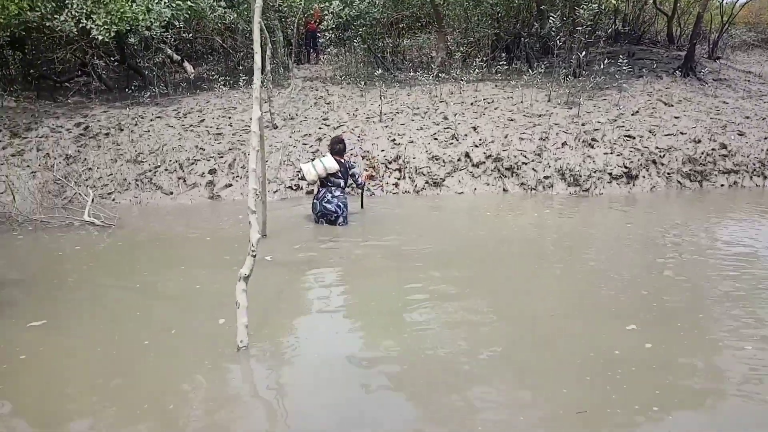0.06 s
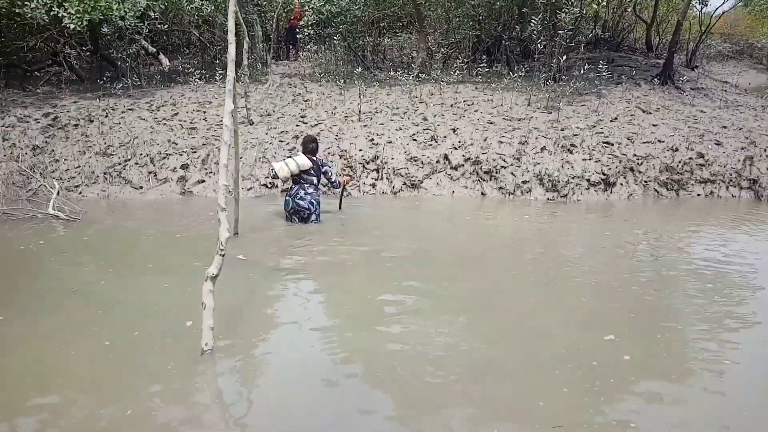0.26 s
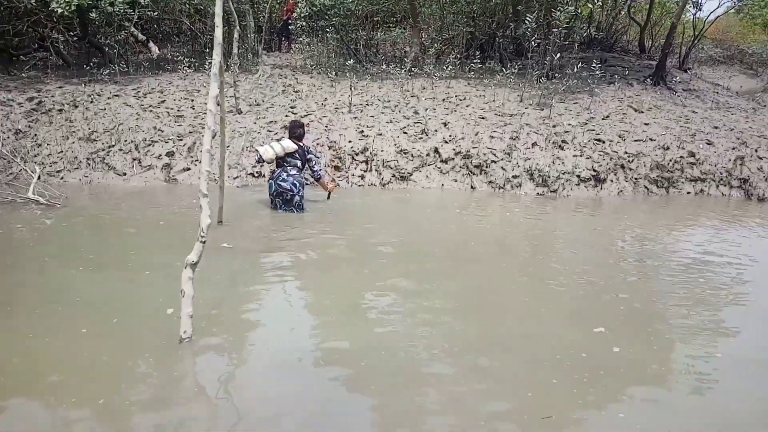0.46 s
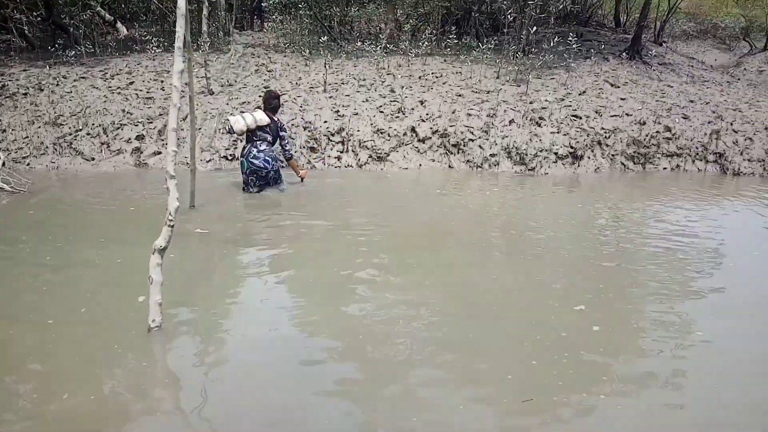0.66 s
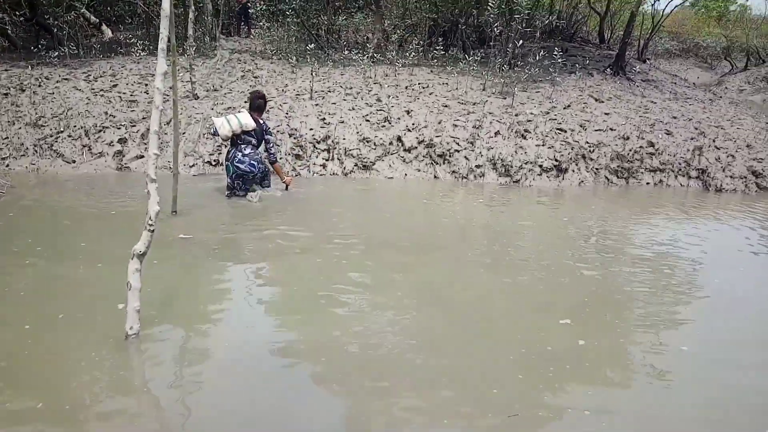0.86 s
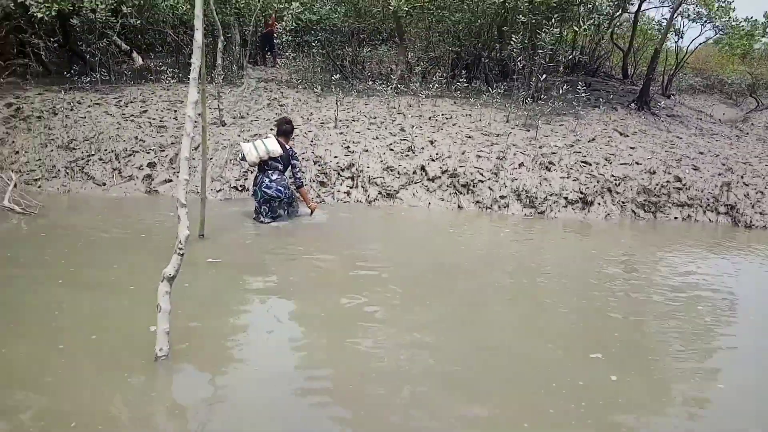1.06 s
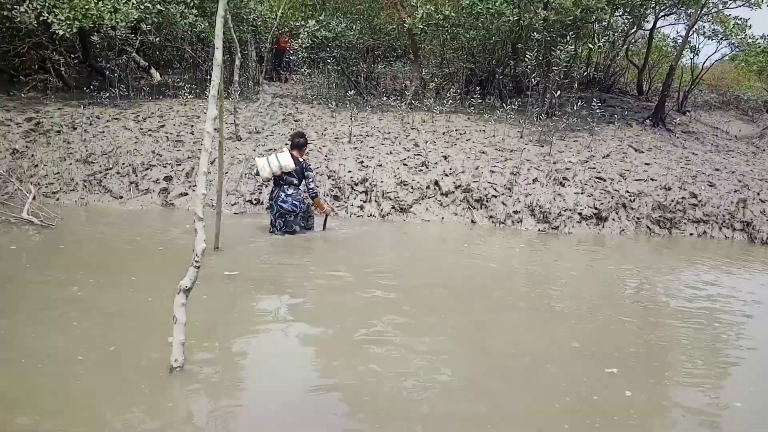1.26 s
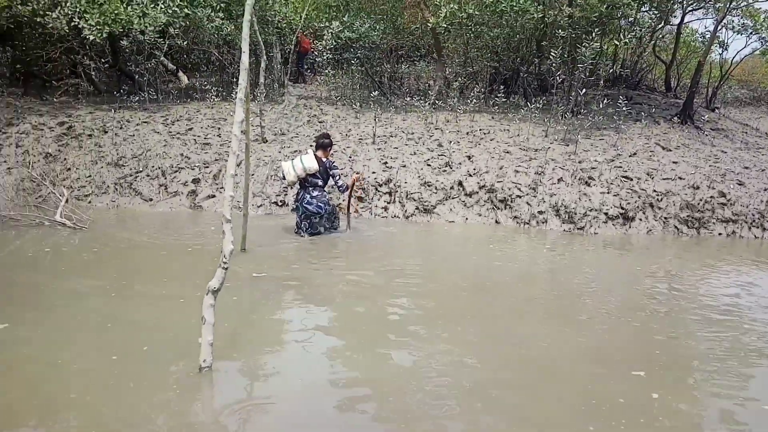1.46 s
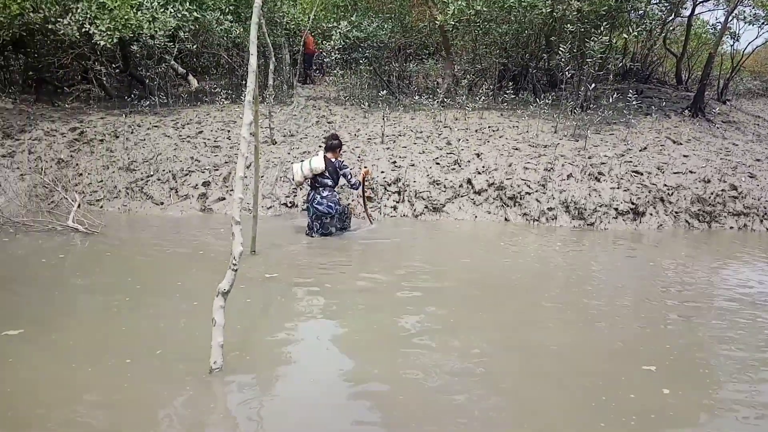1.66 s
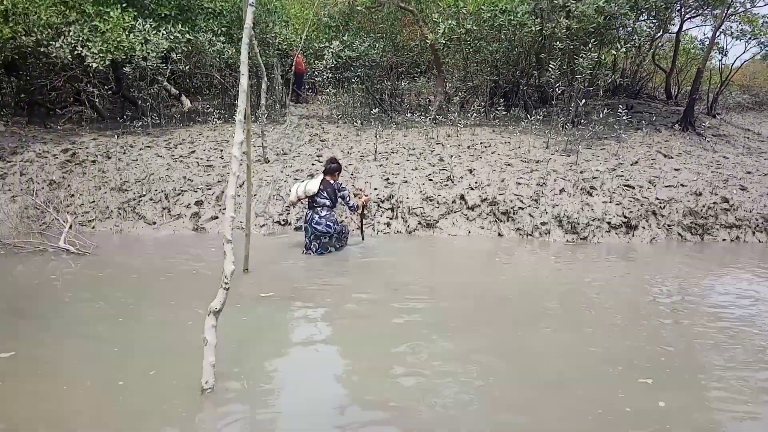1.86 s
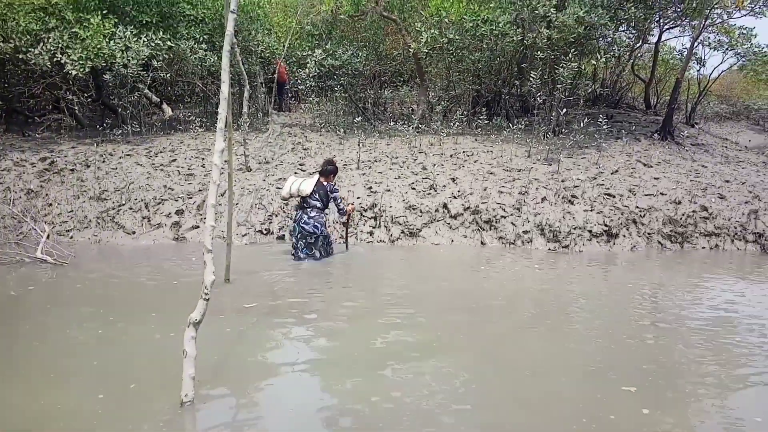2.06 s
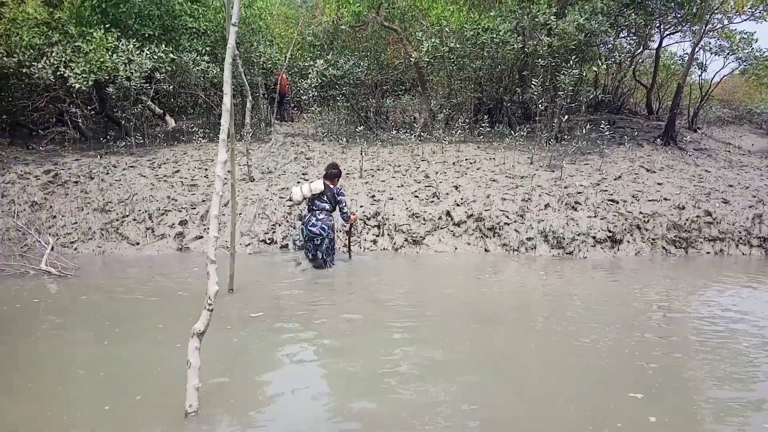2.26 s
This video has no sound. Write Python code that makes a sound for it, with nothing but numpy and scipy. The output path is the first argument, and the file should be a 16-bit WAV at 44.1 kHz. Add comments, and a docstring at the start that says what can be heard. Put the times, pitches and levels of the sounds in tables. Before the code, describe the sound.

Wading splashes in a muddy creek, outdoors in mono. Small splashes start near 0.1 s; the loudest, a crisp slap, hits at 0.36 s, with more slaps and plopping bubbles to 0.7 s. Churning, gurgling slosh swells around 0.75-1.05 s, then fades. Sparse faint drips follow from 1.45 s; a very faint insect whine passes near 2 s, and gentle splashing returns from 2.15 s. Cicadas hiss steadily throughout over faint air noise.

```python
"""A chorus of cicadas hisses over low air noise; then a person wades through a muddy creek; one microphone.
Cicadas are clicks driving resonators, over noise shaped to the spectrum of a far chorus.
Water is swarms of ringing bubbles (spray, slosh), sparse filtered impulses (mist) and single bubbles and drips.
Slaps and churning set the levels of the swarms and the mist; bands of resonant noise swell and fade.
Late on, a small insect whines past: three high harmonics of its gliding wing beat."""
import sys
import numpy as np
from scipy import signal
from scipy.io import wavfile
from scipy.ndimage import uniform_filter1d

SR = 44100
rng = np.random.default_rng(int(sys.argv[2]) if len(sys.argv) > 2 else 0)


def ratio_of_db(decibels):
    """Turn decibels (scalar or array-like) into linear amplitude factors; 0 dB maps to 1."""
    return 10 ** (np.asarray(decibels, float) / 20)


def waveform_to_disk(signal):
    """Save audio, clipped to [-1, 1], as 16-bit WAV at the path in sys.argv[1]."""
    frames = np.transpose(np.atleast_2d(signal))
    scaled = np.clip(frames, -1, 1) * 32767
    samples = np.round(scaled).astype(np.int16)
    wavfile.write(sys.argv[1], SR, samples)


N = 101429
T = np.arange(N) / SR


def evened(x):
    """Normalisation: scales a signal to rms 1."""
    return x / np.sqrt(np.mean(x ** 2) + 1e-20)


def taps_of(points):
    """Minimum phase: the Hilbert transform of the log gain gives the phase of a causal filter."""
    hz, db = np.transpose(points)
    size = 4096
    f = np.abs(np.fft.fftfreq(size, 1 / SR))
    gain_db = np.interp(np.log(f + 1), np.log(hz + 1), db)
    log_gain = np.log(ratio_of_db(np.maximum(gain_db, -100)))
    response = np.exp(np.conj(signal.hilbert(log_gain)))
    return np.fft.ifft(response).real[:size // 2]


def colour(x, points):
    """Linear filtering: shapes x by the given spectrum, then scales it to rms 1."""
    return evened(signal.oaconvolve(x, taps_of(points))[:N])


def wander(top_hz, count=30):
    """Superposition: sines of random phase from 1 Hz to top_hz make a slow random curve of rms 1."""
    rates = np.geomspace(1, top_hz, count)
    phases = rng.random(count)
    return evened(sum(np.sin(2 * np.pi * (f * T + p)) / np.sqrt(f) for f, p in zip(rates, phases)))


def near_cicadas():
    """Forced resonance: uneven clicks drive each near singer's own ringing drum."""
    # Drum resonances of the near singers: f/Hz
    singers_hz = [5136, 5437, 5513, 5660, 6695]
    level_db, pole_bandwidth_hz, jitter = -42, 128, .12  # jitter: rms share of the click rate
    near = np.zeros(N)
    r = np.exp(-np.pi * pole_bandwidth_hz / SR)
    for hz in singers_hz:
        clicks_per_s = rng.uniform(136, 272) * (1 + jitter * wander(150, count=10))
        turns = np.cumsum(clicks_per_s) / SR
        clicks = np.diff(np.floor(turns), prepend=0) * rng.standard_normal(N)
        drum = [1, -2 * r * np.cos(2 * np.pi * hz / SR), r * r]
        once = signal.lfilter([1, 0, -1], drum, clicks)
        near += signal.lfilter([1], drum, once)
    return ratio_of_db(level_db) * evened(near)


def far_cicadas():
    """Incoherent summation: far singers merge into a hiss, made as filtered noise."""
    # Spectrum of the far chorus: f/Hz, relative density level/dB per Hz
    chorus_spectrum = [(3500, -32), (4560, -18.5), (4960, -8), (5470, -2), (6750, -11.5), (8000, -15),
                       (9230, -31), (11600, -30.5), (13000, -39.5)]
    level_db = -40.5 + 0.44 * wander(24.56)
    return ratio_of_db(level_db) * colour(rng.standard_normal(N), chorus_spectrum)


def air():
    """Broadband noise: low rumble of distant water and breeze, with a thin hiss above."""
    # Spectrum of the air noise: f/Hz, relative density level/dB per Hz
    air_spectrum = [(20, -40), (50, -14), (110, -5), (400, -14.5), (1000, -19.5), (3200, -17), (9000, -23),
                    (16000, -30)]
    level_db = -55 + 1.9 * wander(33)
    return ratio_of_db(level_db) * colour(rng.standard_normal(N), air_spectrum)


def bands():
    """Cascaded resonance: noise through two equal resonators, swelling and fading."""
    # Faint bands of hiss: start t/s, length t/s, centre f/Hz, level/dB
    hiss_bands = [(0., 0.24, 335, -52.5), (1.07, 0.56, 342, -59), (1.877, 0.28, 380, -60.5),
                  (1.9, 0.23, 2340, -56)]
    resonator_width = 0.24  # of each resonator, as share of the centre
    out = np.zeros(N)
    for start, length, hz, db in hiss_bands:
        b, a = signal.iirpeak(hz, 1 / resonator_width, SR)
        once = signal.lfilter(b, a, rng.standard_normal(N))
        hiss = evened(signal.lfilter(b, a, once))
        swell = np.sin(np.pi * np.clip((T - start) / length, 0, 1)) ** .5
        out += ratio_of_db(db) * swell * hiss
    return out


def bubble(hz, cycles):
    """Bubble resonance: a pocket of air rings briefly and climbs in pitch."""
    top_rise_hz_per_s, knee_hz = 15500, 800  # the climb is slower for pitches below the knee
    fade_db, squareness = -21, 2.28  # level reached after the given cycles; how long the ring holds first
    c = np.arange(0, cycles * 1.4, hz / SR)  # time in cycles of the starting pitch
    attack = np.sin(np.pi / 2 * np.minimum(c, 1))
    fade = ratio_of_db(fade_db * (c / cycles) ** squareness)
    turns = c + top_rise_hz_per_s * c ** 2 / (hz ** 2 + knee_hz ** 2) / 2
    return attack * fade * np.sin(2 * np.pi * turns)


def add(mix, s, sound):
    """Superposition: mixes a sound in at time s."""
    part = mix[max(round(s * SR), 0):][:len(sound)]
    part += sound[:len(part)]


def single_bubbles():
    """Isolated resonators: bubbles and drips that stand out one by one."""
    # Bubbles and drips: start t/s, level/dB before attack and fade, starting pitch f/Hz, length/cycles
    lone_bubbles = [(.033, -23, 2800, 1.7), (.167, -28, 2550, 17), (.183, -30.5, 2380, 12),
                    (.204, -13, 2640, 2.07), (.311, -15.5, 3300, 2.3), (.3643, 0, 2530, 1.2),
                    (.364, -30, 106, 4.2), (.318, -21, 4030, 8.6), (.366, -20, 300, 2.06),
                    (0.4372, -5, 2570, 4.3), (0.456, -7, 574, 0.65), (0.5168, -7, 910, 1.13),
                    (.53, -12, 3440, 4.6), (0.539, -20, 2960, 6.1), (.5472, -14, 461, 12.7),
                    (.5485, -24.5, 3865, 37), (0.607, -23.5, 1740, 3.2), (.708, -32.5, 992, 21),
                    (.753, -19.5, 633, 2.7), (.755, -24.5, 1455, 14.5), (.778, -25.5, 1930, 14),
                    (0.825, -40, 202, 5.5), (.96, -11.5, 1150, 1.7), (1.449, -37, 3400, 3.1),
                    (1.489, -38, 2080, 4.6), (1.601, -45.5, 1140, 5), (1.66, -52, 600, 32),
                    (1.662, -47, 1900, 9), (1.704, -31.5, 1850, 2), (1.713, -33, 2670, 3.7),
                    (1.764, -38, 2030, 4), (2.06, -37, 1250, 3.8), (2.139, -39, 3500, 27),
                    (2.148, -41.5, 563, 8), (2.194, -29.5, 2150, 4.7), (2.208, -36.5, 474, 13.6),
                    (2.222, -35, 1200, 15), (2.255, -33.5, 910, 4.4), (2.29, -23.5, 800, 2.2)]
    out = np.zeros(N)
    for s, db, hz, cycles in lone_bubbles:
        add(out, s, ratio_of_db(db) * bubble(hz, cycles))
    return out


def droplets(level, points, per_s, shortest_cycles, spread_db, count=30):
    """Shot noise: a swarm of tiny bubbles of all sizes at the given rms level; a few are much louder."""
    strength = ratio_of_db(spread_db * np.minimum(rng.exponential(1, N), 4))
    starts = rng.random(N) < per_s / SR
    size = level * evened(strength * starts * rng.choice([-1, 1], N))

    pitches, taps = np.geomspace(points[1][0], points[-2][0], count), taps_of(points)
    share = pitches ** .5 / np.sum(pitches ** .5)  # high pitches are more frequent
    kind = np.searchsorted(np.cumsum(share), rng.random(N))
    rings = []
    for k, hz in enumerate(pitches):
        ring = bubble(hz, shortest_cycles * (1 + k % 3))  # three lengths in turn
        rings.append(ring / np.linalg.norm(ring) * (hz / share[k]) ** .5)

    # Mean energy of one filtered ring, to bring the swarm to its level
    energy = sum(p * np.sum(signal.fftconvolve(ring, taps) ** 2) for ring, p in zip(rings, share))
    swarm = sum(signal.oaconvolve(size * (kind == k), ring)[:N] for k, ring in enumerate(rings))
    return signal.oaconvolve(swarm, taps)[:N] / np.sqrt(energy)


def water_levels():
    """Addition of powers: churning and slaps together give the rms of spray, slosh and mist."""
    # Steady churning round the legs: t/s, spray level/dB, slosh level/dB
    churning = [(0.598, -56, -54.5), (.72, -52, -43.5), (.77, -41.5, -34.5), (.92, -37.5, -37.5),
                (1., -35, -41.5), (1.07, -38, -54.5), (1.43, -60.5, -63.5), (1.6, -94, -74),
                (2.125, -56, -56), (2.15, -48.5, -52), (2.3, -45.5, -43.5)]
    # Slaps of water: start t/s, spray level/dB, slosh level/dB, mist level/dB, hold t/s
    water_slaps = [(0.122, -38, -48.5, -46, 0.0016), (0.144, -47.5, -67, -56, 0.083),
                   (0.226, -32, -51.5, -50, 0.016), (0.286, -41.5, -51.5, -49, 0.035),
                   (0.361, -15, -31.5, -34, 0.021), (0.434, -22, -27.5, -47, 0.002),
                   (0.442, -32.5, -38.5, -51, 0.021), (0.506, -35.5, -35.5, -53, 0.031),
                   (0.542, -51, -35, -60, 0.0068), (0.603, -43.5, -43, -48, 0.0086),
                   (0.627, -37.5, -52, -60, 0.0082), (0.686, -36, -64, -60, 0.011),
                   (0.798, -39, -48, -49.5, 0.011), (0.935, -41.5, -33.5, -44, 0.022),
                   (1.675, -51.5, -66, -65, 0.029), (2.186, -36.5, -40.5, -58, 0.014),
                   (2.237, -45, -34.5, -55, 0.019)]
    churn_mist_db = -14.5  # relative to the mean of the spray and slosh levels
    rise_share, base_t60_s, t60_per_hold = 0.23, 0.051, 3.6  # rise as share of the hold; 60 dB decay
    s, spray_db, slosh_db = np.transpose(churning)
    mist_db = (spray_db + slosh_db) / 2 + churn_mist_db
    power = np.array([ratio_of_db(np.interp(T, s, db, left=-90)) ** 2 for db in (spray_db, slosh_db, mist_db)])
    for start, *db, hold in water_slaps:
        t = np.maximum(T - start, 0)
        rise = np.minimum(t / (rise_share * hold), 1)
        t60_s = base_t60_s + t60_per_hold * hold  # longer slaps die slower
        decay = ratio_of_db(-60 * np.maximum(t - hold, 0) / t60_s)
        power += (rise * decay * ratio_of_db(np.array(db))[:, None]) ** 2
    return np.sqrt(power)


def spray(level):
    """Shot noise of small bubbles: a dense, bright swarm."""
    # Spectrum of the spray: f/Hz, relative density level/dB per Hz
    spray_spectrum = [(1000, -7.5), (1500, -19.5), (1800, 1), (2900, -3.5), (3300, -0.5), (4300, -8.5),
                      (5400, -7), (10500, -28.5), (13000, -60)]
    return droplets(level, spray_spectrum, per_s=6500, shortest_cycles=7.3, spread_db=2.5)


def slosh(level):
    """Shot noise of large bubbles: a sparser, lower swarm."""
    # Spectrum of the slosh: f/Hz, relative density level/dB per Hz
    slosh_spectrum = [(90, -48), (140, -21), (400, -1), (650, -2), (1500, -2.5), (3000, -7.5),
                      (4200, -53.5)]
    return droplets(level, slosh_spectrum, per_s=2200, shortest_cycles=3.9, spread_db=3)


def mist(level):
    """Filtered shot noise: sparse random impulses in the top treble."""
    # Spectrum of the mist: f/Hz, relative density level/dB per Hz
    mist_spectrum = [(10000, -13.5), (12300, 6.5), (14500, 13), (16000, 4.5)]
    impulses_per_s = 860
    impulses = rng.standard_normal(N) * (rng.random(N) < impulses_per_s / SR)
    return level * colour(impulses, mist_spectrum)


def water():
    """Superposition: single bubbles lie on top of spray, slosh and mist."""
    spray_level, slosh_level, mist_level = water_levels()
    return single_bubbles() + spray(spray_level) + slosh(slosh_level) + mist(mist_level)


def wings():
    """Harmonic series: three high overtones of one wing beat arch up and down together as it flies past."""
    # Pitch track of the wing beat: t/s, f/Hz
    wing_beat = [(1.89, 570), (1.965, 652), (2.02, 664), (2.085, 694), (2.145, 652)]
    # Audible overtones: multiple of the wing beat
    wing_multiples = (19, 20, 22)
    s, hz = np.transpose(wing_beat)
    beat_hz = uniform_filter1d(np.interp(T, s, hz), size=1500)
    turns = np.cumsum(beat_hz) / SR
    near = np.sin(np.pi * np.clip((T - s[0]) / (s[-1] - s[0]), 0, 1)) ** .5
    out = np.zeros(N)
    for k in wing_multiples:
        level_db = -73 + 2 * wander(20)
        out += ratio_of_db(level_db) * near * np.sin(2 * np.pi * k * turns)
    return out


def scene():
    """Superposition at one point: one microphone feeds both channels."""
    mono = near_cicadas() + far_cicadas() + air() + bands() + water() + wings()
    return mono * np.ones((2, 1))


def band_limit(x):
    """A steep low-pass at the top of the band."""
    return signal.sosfilt(signal.butter(12, 15830, fs=SR, output="sos"), x)


def record(dry):
    """Unity gain: the two equal channels pass to the last stage at their own level."""
    return band_limit(dry)


dry = scene()
out = record(dry)
waveform_to_disk(out)
```